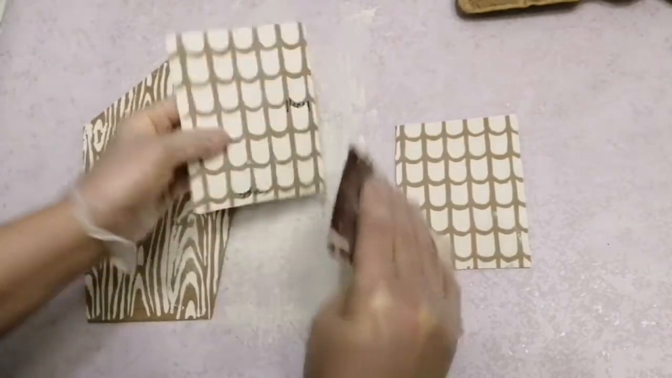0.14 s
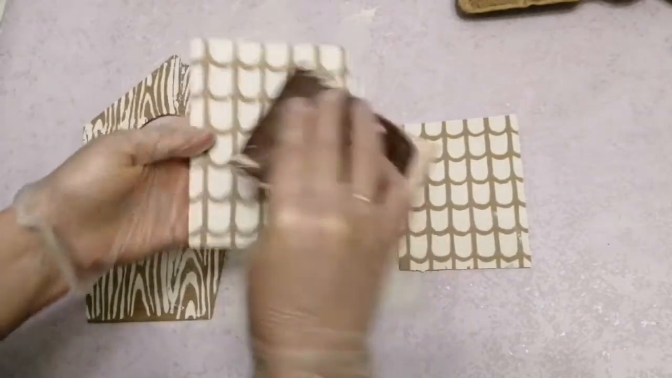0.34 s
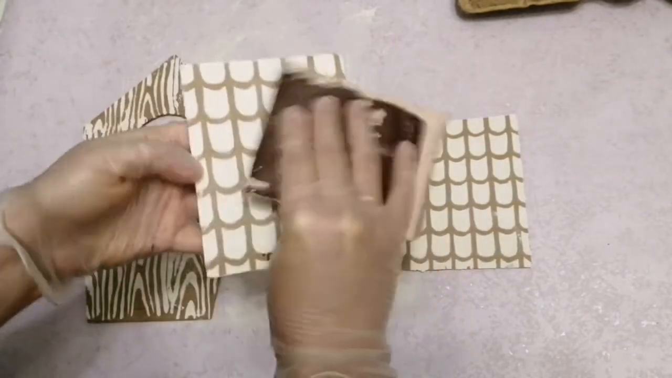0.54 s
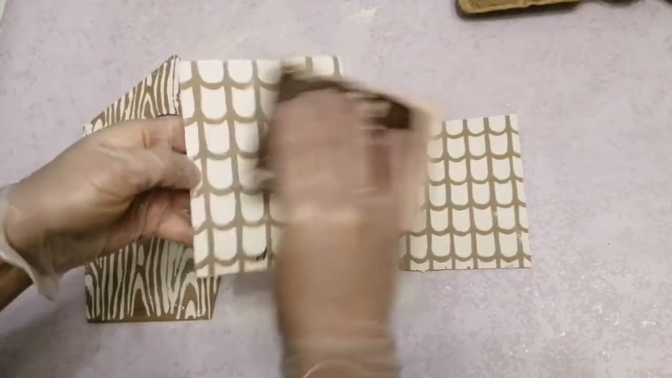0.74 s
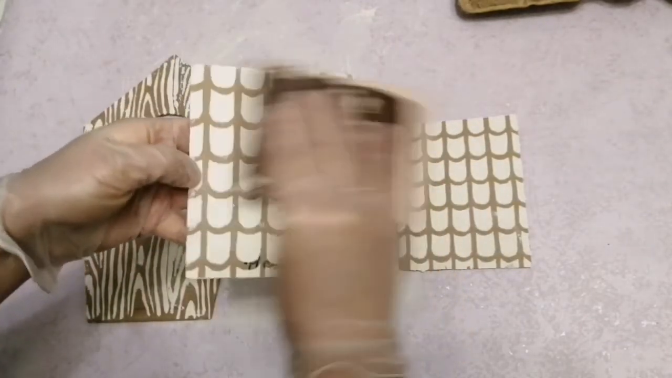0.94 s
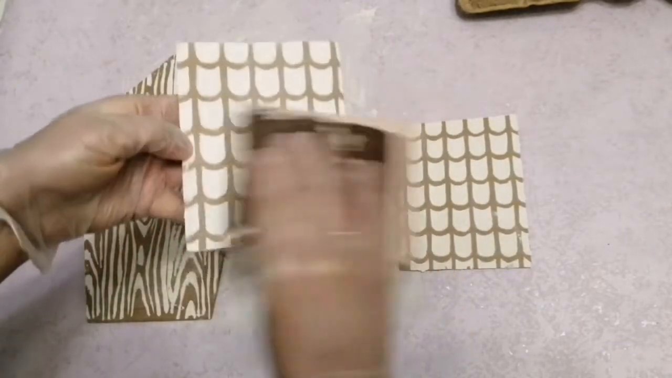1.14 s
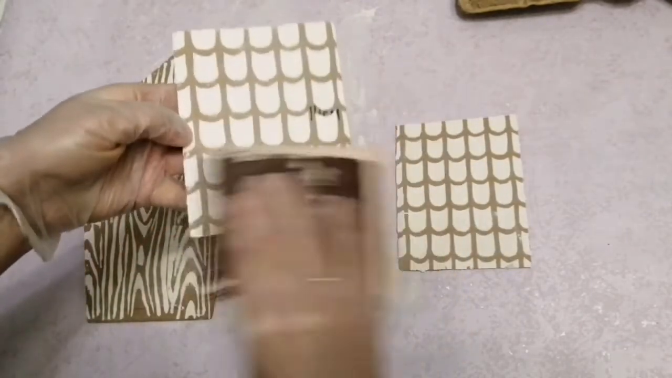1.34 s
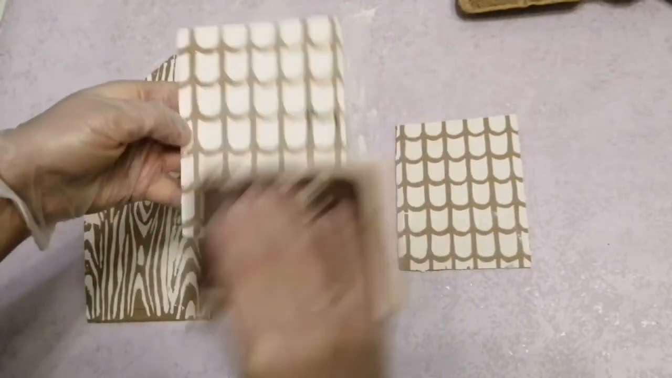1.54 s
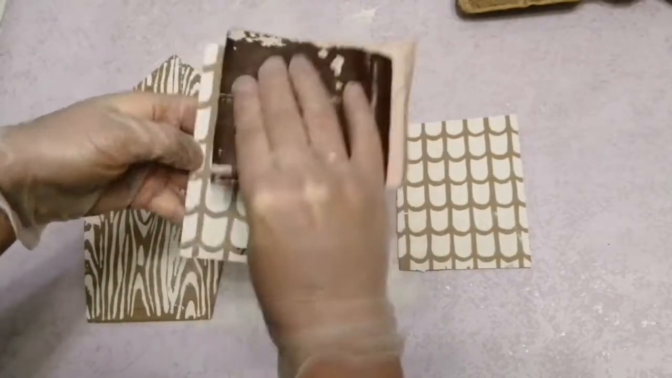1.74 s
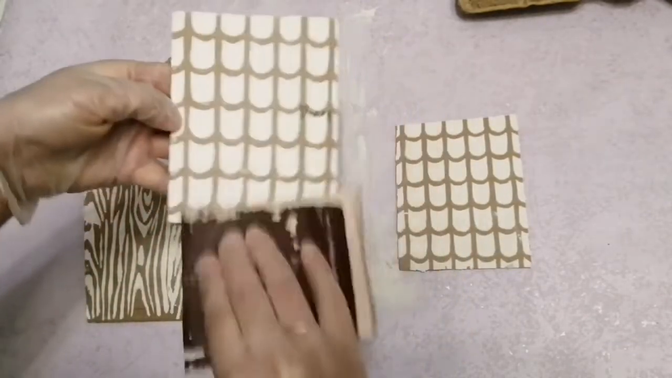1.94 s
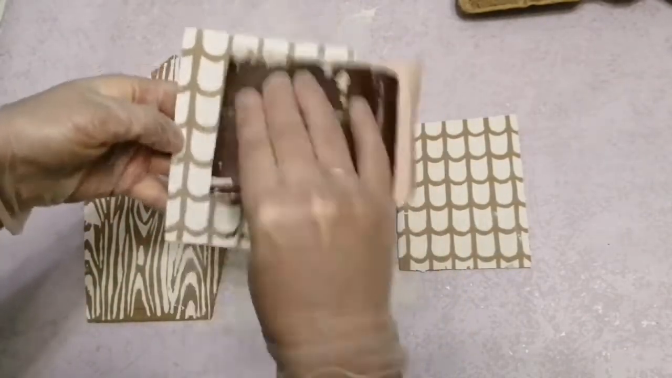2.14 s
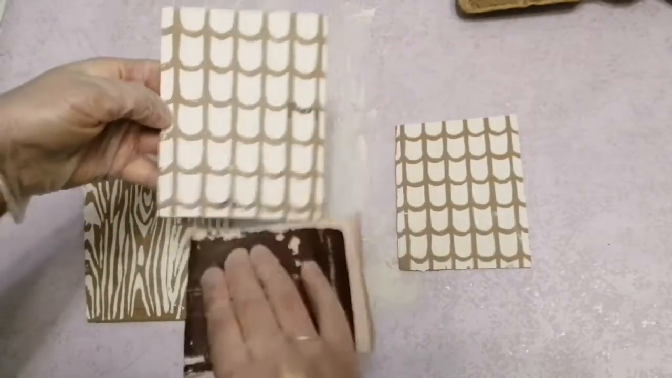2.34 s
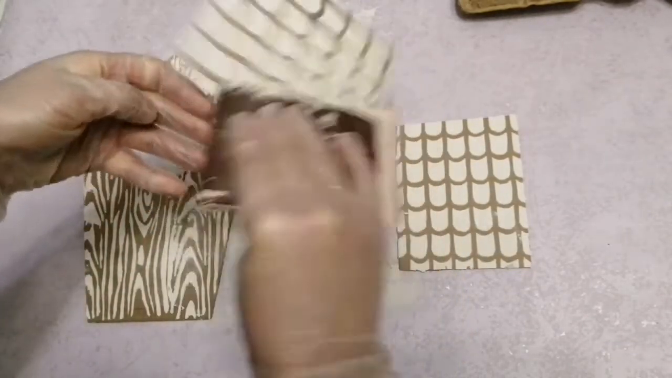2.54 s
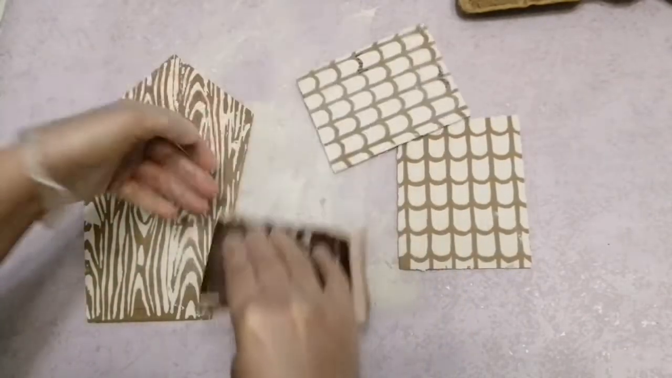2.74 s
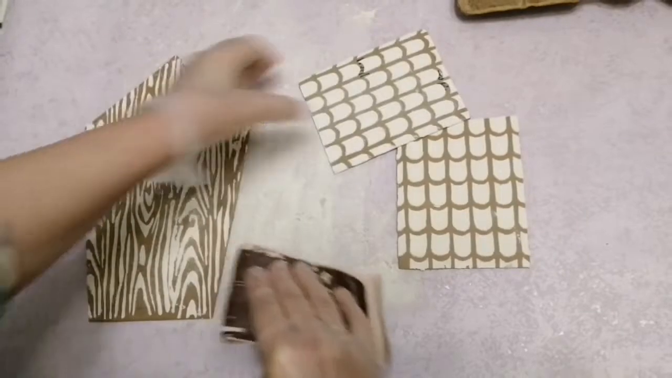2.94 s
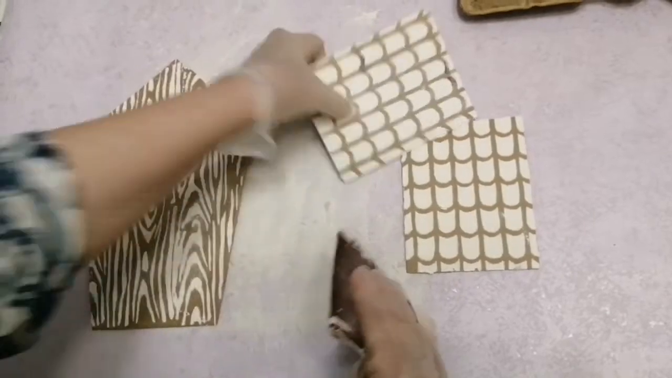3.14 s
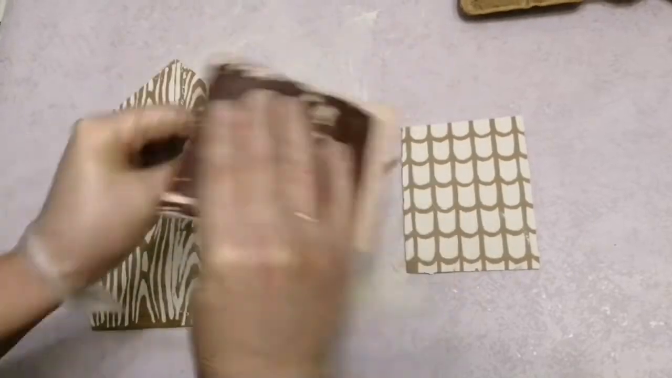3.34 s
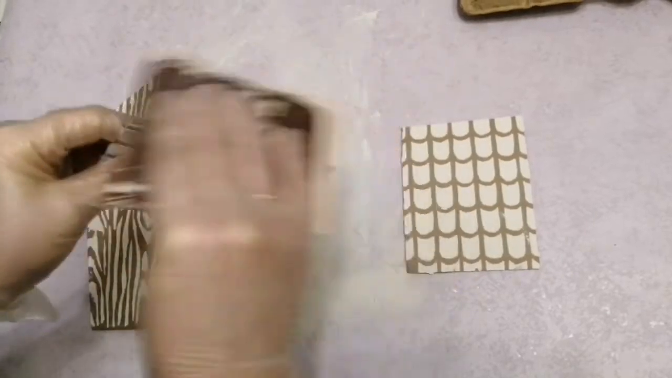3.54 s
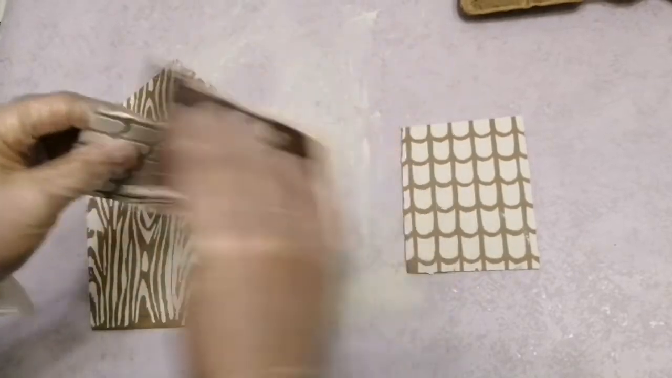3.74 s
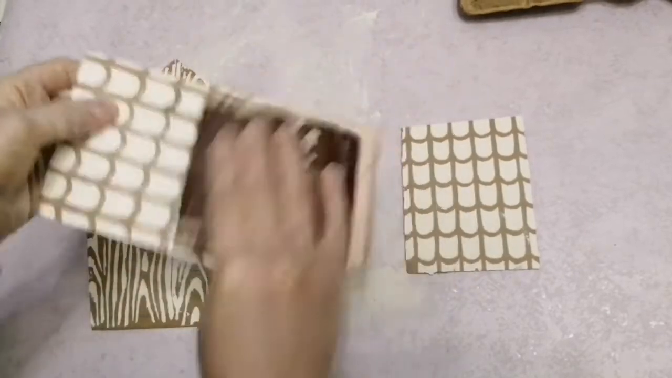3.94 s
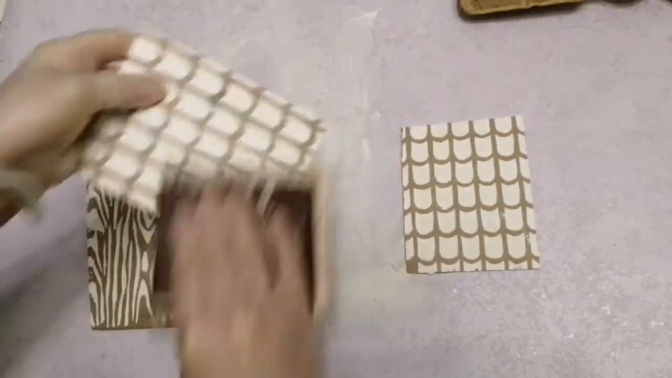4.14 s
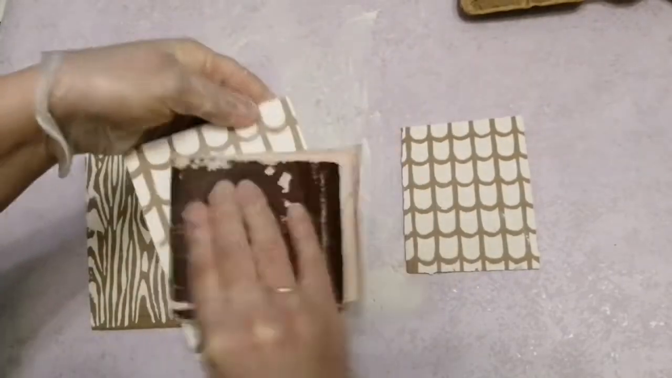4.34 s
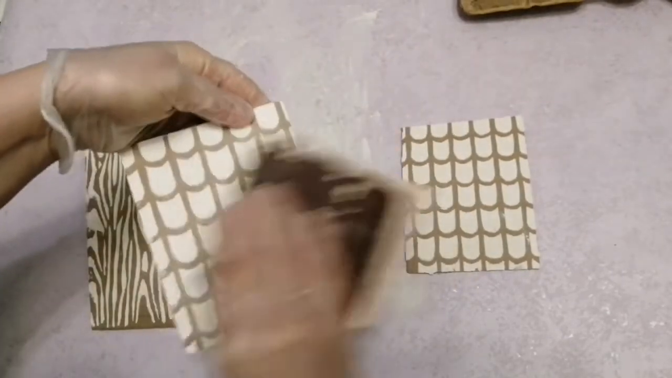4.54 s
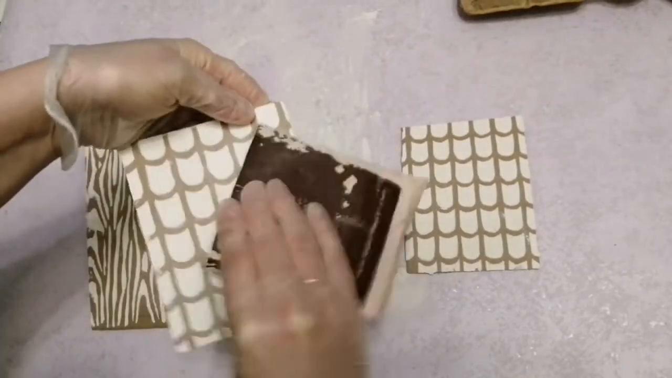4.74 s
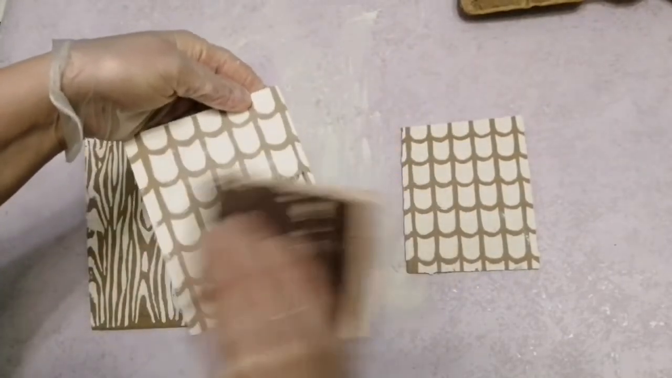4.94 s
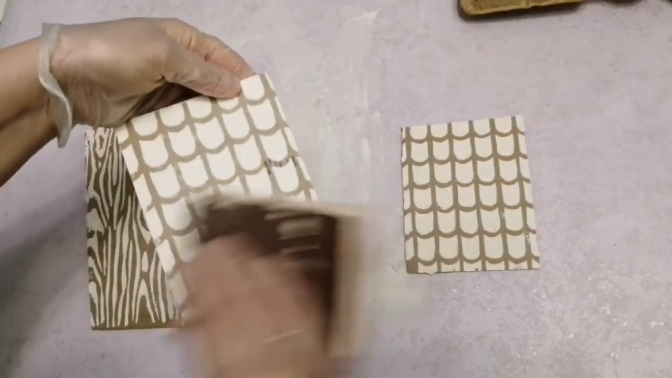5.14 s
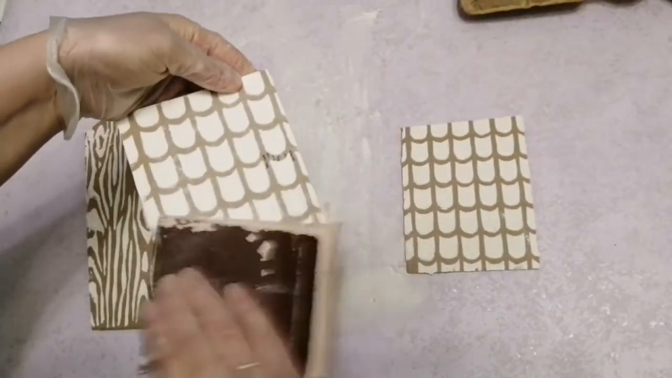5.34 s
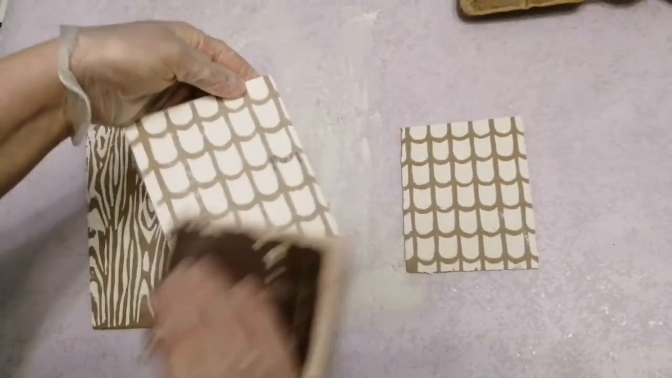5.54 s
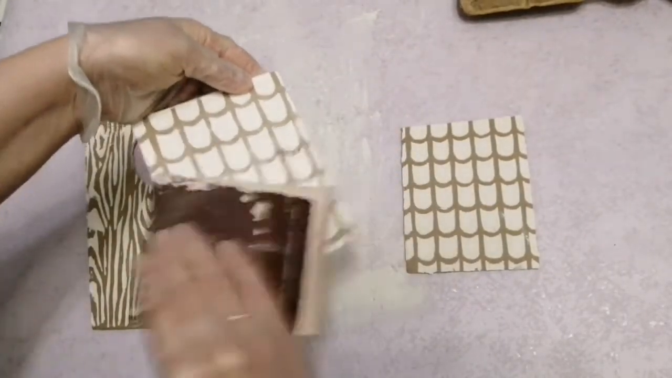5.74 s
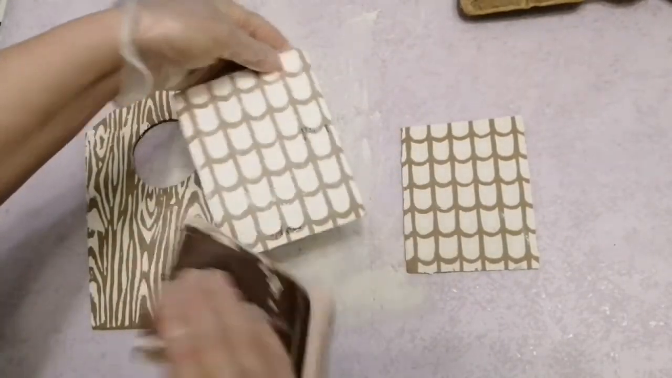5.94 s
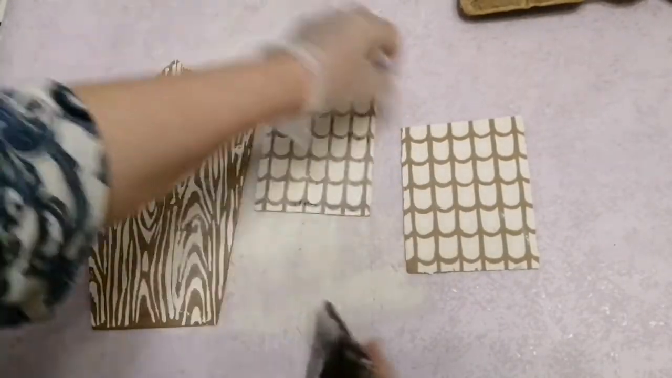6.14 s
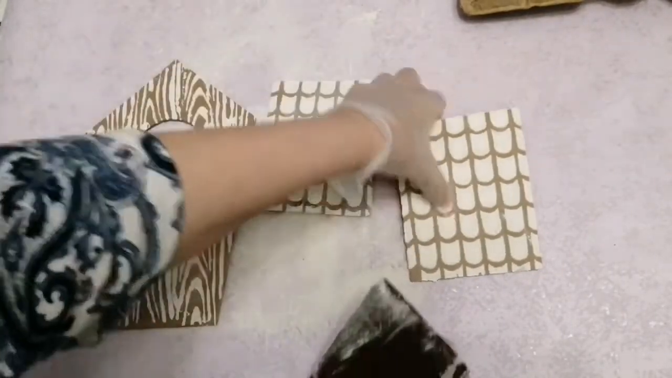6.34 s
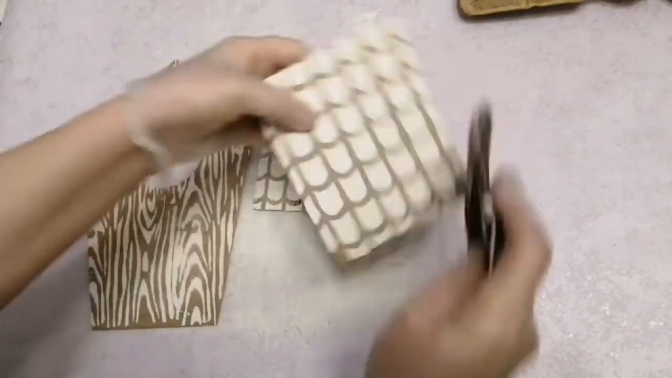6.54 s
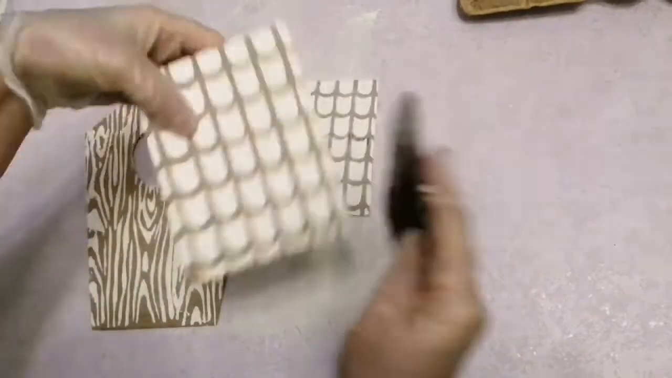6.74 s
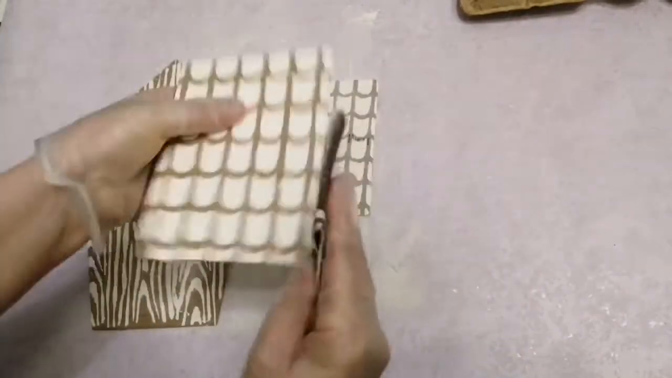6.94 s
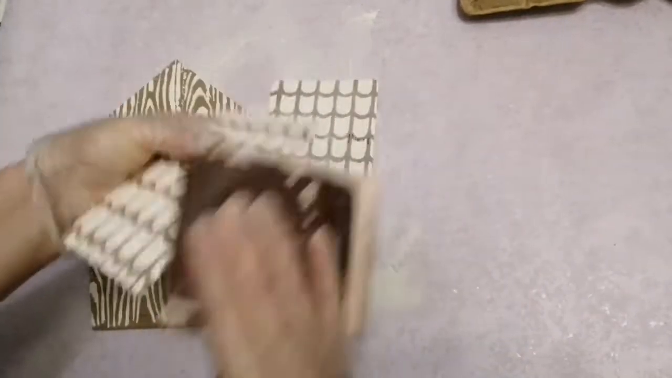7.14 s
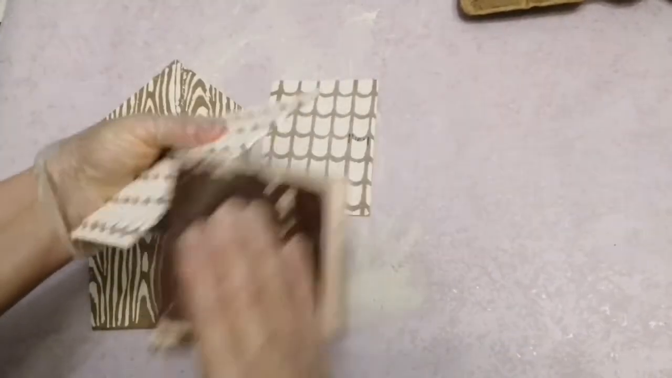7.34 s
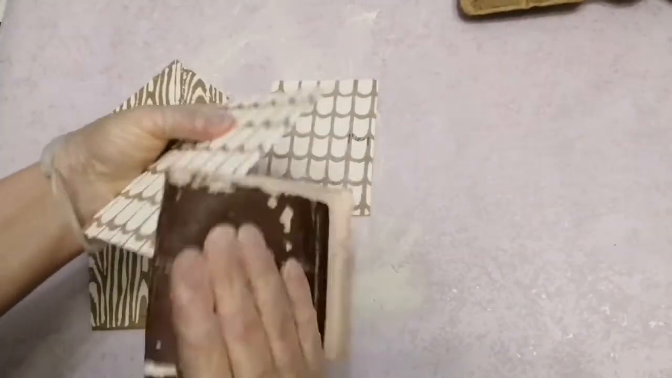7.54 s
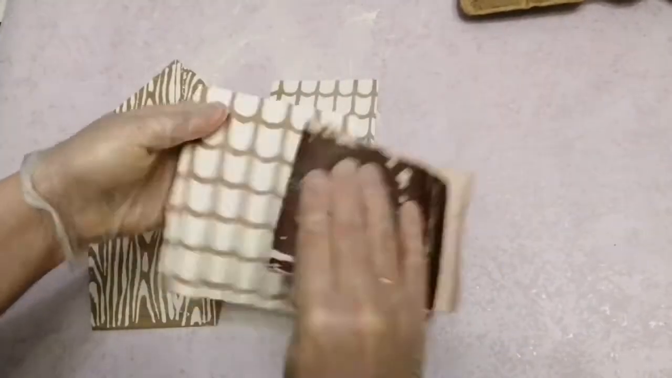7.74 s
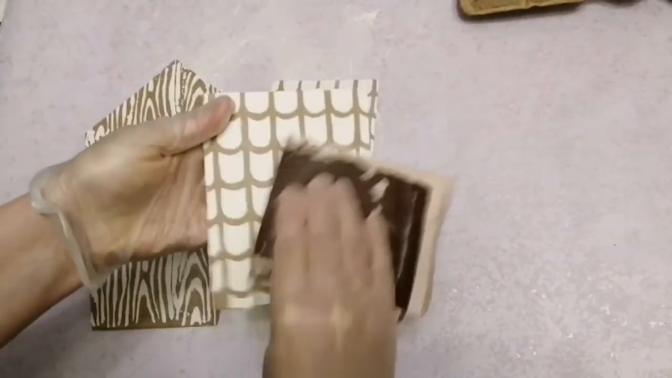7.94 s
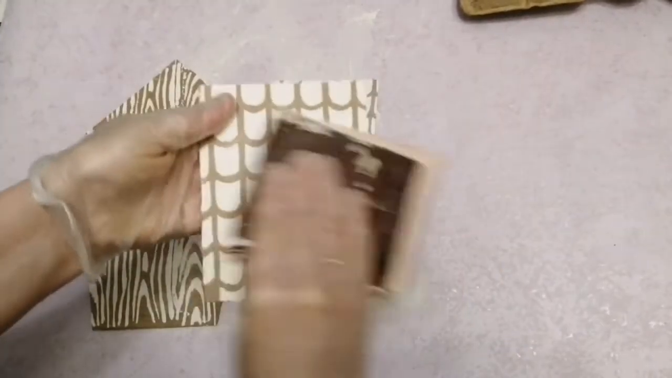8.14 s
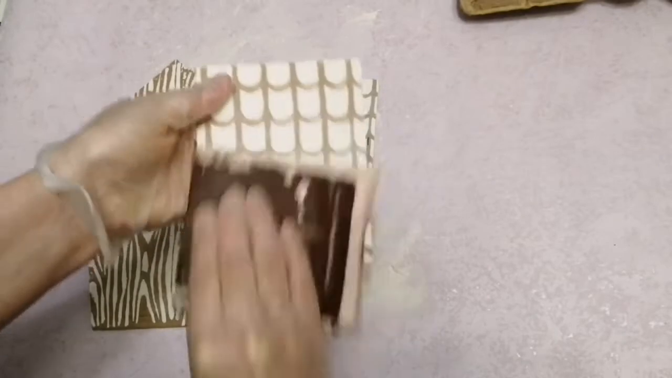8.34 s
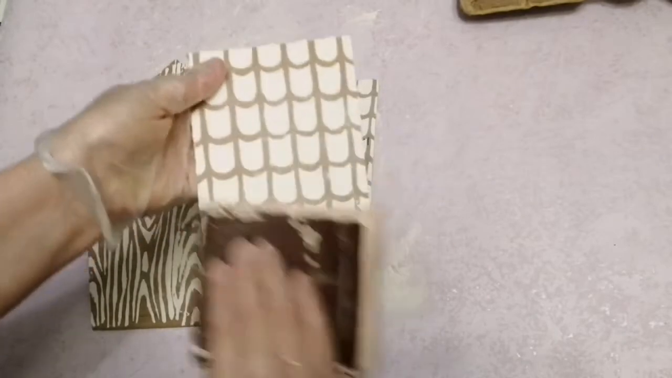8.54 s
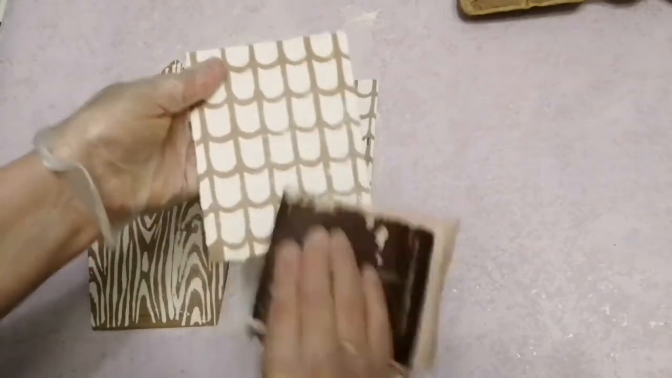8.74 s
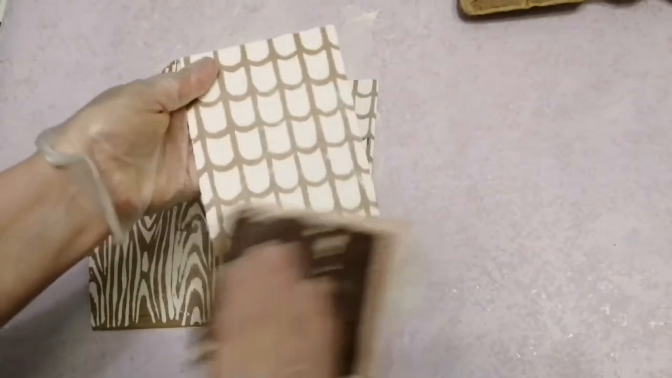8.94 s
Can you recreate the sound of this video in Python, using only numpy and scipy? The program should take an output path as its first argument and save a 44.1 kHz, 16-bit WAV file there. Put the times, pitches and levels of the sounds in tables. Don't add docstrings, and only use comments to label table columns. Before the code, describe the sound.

Sandpaper scrubs back and forth by hand over dried putty on small card sheets, with short pauses, light knocks and clicks, close up in a quiet room.

```python
import sys
import numpy as np
from scipy import signal
from scipy.fft import rfft, irfft
from scipy.io import wavfile
from scipy.ndimage import uniform_filter1d

SR = 44100
rng = np.random.default_rng(int(sys.argv[2]) if len(sys.argv) > 2 else 0)


def digitize_waveform(pressure):
    field = np.atleast_2d(pressure).T
    bounded = np.clip(field, -1, 1)
    quanta = np.round(bounded * 32767).astype(np.int16)
    wavfile.write(sys.argv[1], SR, quanta)


def linear_from_db(decibels):
    return 10 ** (np.asarray(decibels, float) / 20)


N = 396018
TIME = np.arange(N) / SR
RIGHT_LAG = 6


def level(x, db=0):
    return x * linear_from_db(db) / np.sqrt(np.mean(x ** 2))


def even(pair):
    return np.array([level(x) for x in pair])


def band(x, lo_hz, hi_hz, order=2):
    return signal.sosfilt(signal.butter(order, [lo_hz, hi_hz], "band", fs=SR, output="sos"), x)


def colour(x, hz, db):
    log_hz = np.log(np.maximum(np.arange(1025) * SR / 2048, 1))
    cepstrum = irfft(np.interp(log_hz, np.log(hz), db) * np.log(10) / 20)
    cepstrum[1:1024] *= 2
    cepstrum[1025:] = 0
    response = irfft(np.exp(rfft(cepstrum)))
    return signal.fftconvolve(x, response)[:len(x)]


def walk(rate):
    hold = int(SR / rate)
    steps = rng.standard_normal(N // 100)[:N // hold + 1]
    return uniform_filter1d(np.repeat(steps, hold), hold // 2 + 1)[:N]


def panned(db):
    ratio = linear_from_db(db) ** 2
    return np.sqrt(2 * np.array([ratio, ratio ** 0]) / (1 + ratio))


# pitch_hz, left_db, right_db
PORT_RESPONSE = [(150, -21.5, -30.5), (335, -8, -14.5), (650, -4.5, -9.5), (910, -10, -2.5),
                 (1360, -2.5, -0.5), (3240, 5, 5), (4080, -11.5, -3.5), (5310, -8.5, 3), (7100, -10.5, 0.5),
                 (7280, -6.5, -2), (7570, -5.5, -8.5), (12200, -21, -12.5), (15440, -18, -7.5),
                 (16200, -41, -86)]


def ports(pair):
    hz, *db = np.transpose(PORT_RESPONSE)
    left, right = (colour(x, hz, d) for x, d in zip(pair, db))
    return np.array([left, np.roll(right, RIGHT_LAG)])


# start_s, lower_rasp_db re upper rasp, whole_rasp_db re usual
SHEET_BEND = [(0.0, -9, -9), (0.25, -6, 1), (0.6, 0.5, 1.8), (1.5, 0, -0.9), (2.3, 1, 1.7),
              (2.7, -4.5, 3.2), (3.27, 1, -5), (3.45, -8.5, 4), (3.62, -7.5, 2.7), (3.798, -13, 2),
              (4.0, -3.5, 2.5), (4.2, -3.5, 2.1), (4.95, 0, 0), (5.8, 1, -1.7), (6.25, -9, 0.1),
              (6.6, -1, -4.5), (7.65, 5, -0.2), (7.9, -1, 2.4)]


def sanding(rasp_db, hum_db, pan_db, free_db):
    snags = signal.lfilter([1], [1, -.985], (rng.random(N) < 90 / SR) * rng.random(N))
    ridges = linear_from_db(0.89 * walk(45)) * (1 + 0.21 * snags)
    fine = contact(.2, 1.0, .8, 150)
    coarse = contact(.42, 2.5, 1.8, 60)
    fine = bounce(fine, .0007, .4, .3)
    coarse = bounce(coarse, .0016, .5, .5)
    hiss = even(band(fine, 4400, 19000, order=5)) * panned(pan_db)

    rasp = even(band(coarse, 620, 3700, order=6))
    rasp = rasp + linear_from_db(0.97 * free_db) * sheet_modes(coarse)
    lower = signal.sosfiltfilt(signal.butter(2, [650, 2000], "band", fs=SR, output="sos"), rasp)
    s, *columns = np.transpose(SHEET_BEND)
    lower_db, whole_db = (np.interp(TIME, s, c) for c in columns)
    rasp = rasp + (linear_from_db(0.81 * lower_db) - 1) * lower
    rasp = linear_from_db(whole_db) * rasp * panned(pan_db + 0.18)

    hum = even(band(contact(0.95, 1.86, 3.5, 40), 246, 990, order=3)) * panned(1.36 * pan_db + 2.0)
    speed_db = stroke_db()
    pressed_db = hum_db - 0.33 * (speed_db - uniform_filter1d(speed_db, 6000))
    rasp_gain = linear_from_db(rasp_db + 0.5 * (pressed_db - hum_db))
    return linear_from_db(speed_db) * ridges * (hiss + rasp_gain * rasp + linear_from_db(pressed_db) * hum)


def stroke_db():
    turn, low, share, top, start, rest, fall = strokes()
    k = np.clip(np.searchsorted(turn, TIME) - 1, 0, len(turn) - 2)
    rest = rest[k]
    place = (TIME - turn[k] - rest) / (np.diff(turn)[k] - rest)
    share = np.clip(share[k], .02, .97)
    rising = place < share
    speed = np.clip(np.where(rising, place / share, (1 - place) / (1 - share)), 0, 1)
    foot = np.where(rising, low[k], low[k + 1])
    steepness = np.where(rising, start[k], fall[k])
    return foot + (top[k] - foot) * np.sin(np.pi / 2 * speed) ** steepness


# turn_s, full_speed_hiss_db, dip_at_turn_db, rise_share (0-1, part of the stroke until full speed)
FACE_STROKES = [
    (0.474, -31, 19.5, 0.49),
    (0.607, -32, 13, 0.43),
    (0.714, -32, 13.5, 0.47),
    (0.813, -30, 10, 0.59),
    (0.922, -28, 15.5, 0.39),
    (1.026, -28.5, 9.5, 0.43),
    (1.149, -27.5, 5.5, 0.41),
    (1.23, -25, 11, 0.5),
    (1.347, -25, 12, 0.32),
]
QUICK_STROKES = [(4.393, -30.5, 9.4, 0.52), (4.446, -38.5, 4.9, 0.26), (4.493, -33, 12.6, 0.61),
                 (4.553, -28.3, 14.4, 0.43), (4.611, -30.5, 8.2, 0.6), (4.672, -32.5, 7.4, 0.65),
                 (4.701, -30, 4.7, 0.32), (4.737, -30, 10.1, 0.43), (4.787, -31, 12.3, 0.55),
                 (4.836, -31.0, 9, 0.5), (4.888, -30, 7.2, 0.62), (4.913, -31, 3.1, 0.29),
                 (4.945, -29.5, 12, 0.57), (5.006, -30, 6.6, 0.67), (5.032, -32.5, 2.9, 0.29),
                 (5.063, -28.5, 14, 0.43), (5.115, -28.5, 8.5, 0.42), (5.168, -28.5, 5.7, 0.54),
                 (5.192, -30, 2.1, 0.27), (5.219, -31, 8.6, 0.58), (5.269, -27, 14, 0.61),
                 (5.312, -29.5, 11.6, 0.48), (5.372, -31.5, 7.5, 0.38), (5.422, -31.5, 4.1, 0.4),
                 (5.467, -31.5, 5.5, 0.33), (5.51, -32, 7.9, 0.38), (5.567, -34, 6, 0.61),
                 (5.611, -30.5, 6.4, 0.66), (5.669, -32, 13, 0.29), (5.718, -29, 15.4, 0.73),
                 (5.769, -29.5, 6, 0.26)]
EDGE_STROKES = [
    (7.095, -37, 17, 0.74),
    (7.229, -35, 22, 0.41),
    (7.345, -33.5, 18, 0.54),
    (7.475, -35.5, 16.7, 0.65),
    (7.576, -33, 18.7, 0.5),
]
BROAD_STROKES = [(7.906, -31.5, 6.4, 0.64), (7.979, -30, 14, 0.32), (8.16, -30, 10.2, 0.65),
                 (8.231, -31, 2.4, 0.29), (8.31, -30, 7.7, 0.57), (8.481, -31, 11.5, 0.43),
                 (8.633, -32.5, 10.3, 0.87), (8.721, -35.5, 2.7, 0.21), (8.784, -36, 9.6, 0.34),
                 (8.866, -33.5, 4.8, 0.46), (8.927, -34, 15, 0.94)]
# start_s, hiss_before_db, rise_share (0-1), full_speed_hiss_db
AIR_SWEEPS = [(0.385, -58.5, 0.54, -36), (1.436, -38.5, 0, -27), (1.795, -54, 0.27, -26.5),
              (2.197, -74, 0.3, -26), (3.376, -77, 0.43, -35), (3.569, -86, 0.38, -34),
              (3.73, -75, 0.46, -31), (3.942, -86, 0.3, -28.5), (4.122, -80.5, 0.25, -28),
              (4.306, -79.5, 0.63, -29.5), (5.812, -46, 0.19, -33.5), (7.012, -68, 0.35, -35.5),
              (7.812, -70, 0.5, -31)]
# start_s, hiss_before_db, rise_share (0-1), full_speed_hiss_db
GLOVE_BRUSHES = [(0.0, -53, 0.14, -73), (0.064, -70, 0.35, -66.5), (0.13, -68, 0.35, -52.5),
                 (0.318, -54.5, .17, -53.5), (1.748, -89, 0.26, -55), (2.176, -76.5, 0.2, -50.5),
                 (2.461, -49.5, 0.27, -46.5), (2.579, -62, 0.22, -55.5), (2.653, -62, 0.29, -55),
                 (2.688, -62, 0.076, -38), (2.728, -50, 0.02, -44.5), (2.982, -76.5, 0.7, -48),
                 (3.167, -53.5, 0.25, -48), (3.215, -54, 0.71, -58.5), (3.325, -70, 0.05, -63),
                 (3.869, -53, 0.48, -56), (5.932, -58, .1, -70), (6.07, -76, 0.65, -57),
                 (6.189, -72, .29, -73), (6.241, -77, 0.64, -58), (6.282, -60, 0.56, -56),
                 (6.347, -66, 0.19, -47), (6.438, -55, 0.21, -43.5), (6.54, -56.5, 0.69, -51.5),
                 (6.634, -58, .043, -65), (6.703, -68, 0.17, -63), (6.8, -74, 0.16, -42),
                 (6.917, -61.5, 0.73, -50.5), (7.725, -57, 0.34, -54)]


def strokes():
    # slowness of the start, rest at the turn s, earliness of the slowing
    bouts = ((FACE_STROKES, (0.83, 0.0059, 1.75)), (QUICK_STROKES, (0.61, 0.0028, 1.56)),
             (EDGE_STROKES, (0.43, 0.0037, 1.45)), (BROAD_STROKES, (0.41, 0.0024, 0.7)))
    rows = [(s, top - dip, share, top, *gait) for bout, gait in bouts for s, top, dip, share in bout]
    for moves, (least, more, fall) in (AIR_SWEEPS, (0.18, 1.76, 1.46)), (GLOVE_BRUSHES, (0.59, 5.3, 2.5)):
        rows += [(*row, least + more * row[2] ** 2, 0, fall) for row in moves]
    rows.sort()
    end = (N / SR, rows[-1][3], *rows[-1][2:])
    return np.transpose(rows + [end])


def grit(density, scatter_db):
    size = linear_from_db(scatter_db * np.minimum(rng.exponential(size=N), 5))
    ticks = (rng.random(N) < density) * size
    return level(ticks * rng.standard_normal(N))


def contact(shared, scatter_db, patchy_db, patch_rate):
    both, *own = (grit(.3, scatter_db) for _ in range(3))
    heard = ports(np.sqrt(shared) * both + np.sqrt(1 - shared) * np.array(own))
    return heard * linear_from_db(patchy_db * walk(patch_rate))


def bounce(pair, lag_s, sway, share):
    drift = uniform_filter1d(walk(14), 1500)
    late = TIME - lag_s * (1 + sway * np.tanh(drift))
    return np.array([x + share * np.interp(late, TIME, x) for x in pair])


# pitch_hz, width_hz, level_db re rasp when loosely held
BENDING_MODES = [
    (277, 45, -22),
    (400, 40, -19),
    (484, 102, -18.5),
    (1256, 190, -17.5),
    (1560, 62, -20),
    (2410, 340, -13),
    (2800, 230, -20.5),
]


def sheet_modes(x):
    total = 0
    for hz, width, db in BENDING_MODES:
        mode = even(signal.lfilter(*signal.iirpeak(hz, hz / width, fs=SR), x))
        total = total + linear_from_db(db + 3.06 * walk(18)) * mode
    return total


def knocks(pan_db):
    out, t = np.zeros((2, N + 9000)), TIME[:8000]
    events = blows()
    dust = rng.standard_normal((len(events), 2, len(t)))
    for (s, thud_db, hz, ring_s, snap_db, tick_db), noise in zip(events, dust):
        fade = np.exp(-np.log(1000) * t / ring_s)
        sheet = np.sin(2 * np.pi * hz * t) + 0.058 * np.sin(2 * np.pi * 1.52 * hz * t) * fade
        push = 0.4 * np.sin(2 * np.pi * 260 * t) * np.exp(-(t / 0.0012) ** 2)
        rattle = 0.2 * level(band(noise[0], 0.67 * hz, 1.29 * hz)) * np.sqrt(fade)
        thud = -band(0.49 * sheet * fade + push + rattle, 160, 1550)
        heard = ports(noise + noise[0])
        upper_mode = band(heard, 3.3 * hz, 3.9 * hz, order=1)
        card = band(heard, 720, 4100) + 0.59 * upper_mode
        snap = even(card) * (np.exp(-t / .0028) + .14 * np.exp(-t / .02))
        tick = even(band(heard, 3160, 11600)) * (np.exp(-t / 0.0029) + 0.089 * np.exp(-t / 0.015))
        at = int((s + .001) * SR)
        crack = linear_from_db(snap_db + 5.0) * snap + linear_from_db(tick_db + 2.0) * tick
        out[:, at:at + len(t)] += linear_from_db(thud_db) * panned(pan_db[at] + 6.0)[:, None] * thud
        out[:, at:at + len(t)] += panned(pan_db[at])[:, None] * crack
    return out[:, :N]


# start_s, thud_db, pitch_hz, grit_tick_db
PAPER_LANDINGS = [(0.302, -46, 440, -56), (0.393, -43, 486, -44), (0.427, -38, 544, -29),
                  (1.446, -42, 770, -47), (1.806, -37, 614, -34), (2.323, -27, 730, -42),
                  (2.481, -37.5, 650, -48), (2.664, -65, 377, -57), (2.701, -34.5, 450, -45),
                  (3.217, -47, 215, -57), (3.593, -28, 390, -34), (3.743, -34.5, 446, -57),
                  (3.956, -28.5, 458, -46), (4.335, -39, 454, -41), (5.948, -67, 223, -49),
                  (6.136, -50, 194, -41), (6.638, -63, 466, -62), (6.867, -40, 373, -42),
                  (7.036, -36, 590, -34), (7.146, -29, 614, -51), (7.791, -41, 368, -62)]
# start_s, thud_db, pitch_hz, card_snap_db
CARD_DROPS = [(0.451, -46, 470, -43), (2.357, -26, 502, -35), (2.69, -34, 440, -36),
              (2.729, -30.5, 292, -25.5), (2.746, -30, 423, -37), (3.066, -41.5, 271, -46),
              (3.378, -37, 396, -52), (3.571, -31.5, 385, -49), (3.946, -29, 668, -46),
              (4.132, -40, 503, -55), (5.899, -46.5, 426, -54), (6.114, -47, 394, -45),
              (6.157, -62, 240, -49), (6.266, -41.5, 373, -52), (6.364, -46, 720, -36),
              (6.444, -43, 454, -45), (6.481, -32.5, 456, -40.5), (6.554, -40.5, 550, -70),
              (6.821, -33, 412, -34), (6.964, -38.5, 400, -45.5), (7.101, -38.5, 550, -36.5),
              (7.175, -30, 413, -32)]
# start_s, thud_db, pitch_hz, card_snap_db, ring_s
HELD_KNOCKS = [(0.004, -43, 368, -76, 0.38), (0.007, -40, 261, -65, 0.22), (0.074, -43.5, 280, -68, 0.25),
               (0.1, -54, 383, -72, 0.17), (1.752, -25, 400, -37.5, 0.044), (1.755, -33, 323, -65, 0.11),
               (2.177, -19.5, 370, -67, 0.026), (2.49, -28, 222, -40, 0.043), (2.509, -34, 220, -41, 0.045),
               (2.598, -40.5, 474, -59, 0.26), (2.603, -40.5, 215, -60, 0.23),
               (3.175, -46, 400, -38.5, 0.11), (3.191, -39, 468, -41.5, 0.11),
               (3.721, -45, 406, -61, 0.084), (4.121, -38, 393, -61, 0.14), (6.092, -51.5, 484, -72, 0.26)]


def blows():
    def ring_s(hz):
        return 0.085 * (400 / hz) ** 0.24

    landings = [(s, db, hz, ring_s(hz), tick - 6.5, tick) for s, db, hz, tick in PAPER_LANDINGS]
    drops = [(s, db, hz, ring_s(hz), snap, snap - 4) for s, db, hz, snap in CARD_DROPS]
    held = [(s, db, hz, own_s, snap, snap + 3.5) for s, db, hz, snap, own_s in HELD_KNOCKS]
    return landings + drops + held


# start_s, peak_db, pitch_hz
CATCH_CLICKS = [(0.104, -52, 4900), (2.227, -29, 5500), (2.585, -52, 6500), (2.664, -40, 5700),
                (2.69, -34, 5500), (2.7, -30, 6000), (2.73, -23, 3020), (2.73, -25, 6500),
                (2.814, -39, 2800), (2.832, -40, 2800), (2.845, -41, 2370), (3.572, -42, 2600),
                (3.967, -26, 3300), (3.972, -22, 5200), (3.99, -26, 5500), (4.017, -24, 5600),
                (4.123, -39, 5500), (4.124, -41, 2500), (4.131, -35, 2400), (4.502, -31, 5570),
                (4.569, -22, 5800), (4.901, -30, 5700), (5.289, -27, 6060), (5.347, -24, 6000),
                (5.645, -33, 2800), (5.683, -30, 2700), (5.687, -20, 5900), (5.73, -29, 2700),
                (6.137, -37, 5570), (6.197, -49, 5500), (6.222, -52, 2900), (6.266, -46, 5800),
                (6.342, -46, 6000), (6.345, -45, 2000), (6.372, -36.5, 1500), (6.372, -45, 2600),
                (6.449, -40, 5000), (6.487, -33, 6000), (6.635, -44.5, 3000), (6.6355, -35, 6900),
                (7.105, -36, 3000), (7.239, -33, 5900), (7.357, -36, 6000), (7.428, -30, 2500),
                (7.826, -42, 1800), (7.841, -23.5, 1880), (7.866, -29, 2800), (8.335, -24, 5400)]


def clicks(pan_db):
    out, t = np.zeros((2, N)), TIME[:2000]
    fade_cycles, width = 7.6, 1.21
    for (s, db, hz), noise in zip(CATCH_CLICKS, rng.standard_normal((len(CATCH_CLICKS), 2, len(t)))):
        at = int(s * SR)
        burst = even(band(noise + noise[0], hz / width, hz * width)) * np.exp(-t * hz / fade_cycles)
        out[:, at:at + len(t)] += linear_from_db(db - 3) * panned(pan_db[at])[:, None] * burst
    return out


# start_s, peak_db, pitch_hz, ring_s
TAP_MODES = [(2.601, -39, 1900, 0.031), (2.601, -47, 1170, 0.061), (2.601, -53, 920, .09),
             (2.691, -36, 1850, 0.055), (2.693, -36, 1094, .06), (2.179, -41, 163, 0.07),
             (3.966, -18, 3230, 0.052), (4.015, -30, 3270, 0.045), (2.745, -44, 1090, 0.12),
             (3.481, -29, 2400, .05), (3.795, -26, 2800, 0.1), (2.7, -40, 1480, .04),
             (2.73, -32, 3470, .02), (2.731, -17, 4300, 0.011), (2.73, -28, 1736, 0.033),
             (2.744, -33, 1754, 0.06), (2.504, -27, 2830, 0.023), (3.172, -44, 1584, 0.11),
             (3.178, -46, 2070, 0.11), (3.377, -45, 1980, .04), (3.385, -42, 2200, 0.044),
             (6.114, -45, 2320, .04), (6.197, -39, 3070, .03), (6.203, -46, 2800, .03),
             (6.266, -33.5, 2900, 0.015), (6.585, -53, 2020, .1), (6.655, -57, 740, 0.067),
             (7.406, -35, 1040, 0.092), (7.661, -36, 1450, 0.06), (7.665, -34, 461, 0.06),
             (3.429, -35, 500, 0.05), (6.137, -39, 1830, 0.03), (6.44, -39, 970, 0.055),
             (6.482, -37, 2300, .04), (6.816, -28.5, 1900, 0.035), (6.962, -40, 1910, 0.064),
             (7.033, -26, 1620, 0.039), (7.521, -32.5, 494, 0.11), (7.28, -33.5, 436, 0.057),
             (7.592, -40.5, 1214, 0.19), (5.94, -52, 1110, 0.056), (5.886, -42, 1020, 0.054)]
# start_s, peak_db, pitch_hz, ring_s
TABLE_BOOMS = [(0.084, -56, 45, .2), (0.731, -43, 388, 0.25), (0.736, -54.5, 273, 0.27),
               (1.96, -54.5, 281, 0.26), (2.505, -43, 90, 0.12), (5.934, -58, 130, .15),
               (6.03, -55, 150, 0.23), (6.134, -46, 262, 0.11), (6.135, -45, 140, .1),
               (6.267, -52, 113, 0.098), (6.375, -54, 185, 0.27), (6.482, -40, 185, 0.051),
               (6.548, -50, 100, 0.16), (6.562, -54, 400, 0.11)]


def pings(pan_db):
    out, t = np.zeros((2, N)), TIME[:6000]
    port_delay = np.array([[0], [RIGHT_LAG / SR]])
    taps = TAP_MODES + TABLE_BOOMS
    for (s, db, hz, ring_s), turn in zip(taps, rng.random(len(taps))):
        shape = (1 - np.exp(-t / 0.00049)) * np.exp(-np.log(1000) * t / ring_s)
        at = int(s * SR)
        ring = np.sin(2 * np.pi * (hz * (t - port_delay) + turn))
        out[:, at:at + len(t)] += linear_from_db(db) * panned(pan_db[at])[:, None] * shape * ring
    return out


def squeak():
    start_s, end_s, pitch_hz, level_db = 1.62, 1.74, 4270, -70
    u = np.clip((TIME - start_s) / (end_s - start_s), 0, 1)
    pitch = pitch_hz + 30 * walk(40) - 130 * u ** 3
    swell = linear_from_db(level_db + 2 * walk(30)) * np.sin(np.pi * u) ** .4
    return swell * np.sin(2 * np.pi * np.cumsum(pitch) / SR)


# start_s, rumble_db, shudder_s
TABLE_JOLTS = [(0.07, -59.5, 1), (0.385, -53, .5), (1.68, -75, 0.61), (1.77, -68, .4), (2.178, -39, 0.15),
               (2.3, -56, 0.98), (2.485, -50.5, 0.47), (2.6, -69, 0.37), (2.7, -54.5, 0.75),
               (3.06, -63, 0.66), (3.2, -63, 0.16), (3.59, -63, .2), (3.745, -60, 0.27), (3.945, -49, 0.19),
               (4.13, -57, 0.3), (4.33, -64, 0.17), (5.36, -70, 0.69), (5.92, -74, 0.76), (6.03, -81, 0.91),
               (6.125, -66, 0.38), (6.38, -59, 0.5), (6.48, -62, 0.47), (6.81, -65, 0.78),
               (7.13, -61, 0.95), (7.64, -56, 0.23), (7.785, -53, 0.23), (8.75, -71, .9)]


def table():
    mid, side = rng.standard_normal((2, N))
    shake = band(mid + 0.5 * side * np.array([[1], [-1]]), 26, 334)
    size = np.full(N, linear_from_db(-72.5))
    for s, db, shudder_s in TABLE_JOLTS:
        after = size[int(s * SR):int(s * SR) + SR]
        since = TIME[:len(after)]
        after += linear_from_db(db) * np.minimum(since / 0.0025, 1) * np.exp(-np.log(1000) * since / shudder_s)
    return level(shake) * size * linear_from_db(2.0 * walk(25))


def room(x, t60, wet_db):
    t = TIME[:12000]
    tail = rng.standard_normal((2, len(t))) * np.exp(-np.log(1000) * t / t60) * (t > .003)
    tail = tail / np.sqrt(np.sum(tail ** 2, axis=1, keepdims=True))
    return linear_from_db(wet_db) * signal.fftconvolve(x, tail, axes=1)[:, :N]


# pitch_hz, level_db per Hz
ROOM_SPECTRUM = [(18, -41), (30, -10), (156, -28), (270, -46), (369, -11), (561, -1.5), (3150, -2.5),
                 (3880, -6), (6720, -1), (10500, -10), (15500, -11)]


def hush():
    hz, db = np.transpose(ROOM_SPECTRUM)
    mid, side = rng.standard_normal((2, N))
    side = signal.sosfilt(signal.butter(1, 60, "high", fs=SR, output="sos"), side)
    return level(np.array([colour(x, hz, db) for x in (mid + side, mid - side)]), -67.5)


# start_s, freedom_to_vibrate_db, left_minus_right_db
SHEET_GRIP = [(0.0, 20, -2.5), (0.2, -5.5, -0.5), (0.75, 0, -0.5), (1.4, -6.5, -2), (2.0, -3.5, -2.5),
              (2.6, -9, -2.5), (2.9, 19.5, 3.5), (3.25, 0, -1.5), (3.5, 6.5, -1.5), (4.3, 0.5, -1),
              (4.65, -8, -6), (5.75, -3.5, -6), (6.1, 8, -11.5), (6.6, 5.5, -8), (7.2, 11, -4),
              (7.75, 0, -2.5), (8.4, -2, -5), (8.98, 5.5, -3)]


def scene():
    s, *columns = np.transpose(SHEET_GRIP)
    free_db, pan_db = (np.interp(TIME, s, c) for c in columns)
    near = sanding(-5.5 + 0.15 * free_db, -15.5 + free_db, pan_db, free_db)
    near = near + knocks(pan_db) + clicks(pan_db) + pings(pan_db) + squeak()
    return near + room(near, .2, -18) + table() + hush()


def top_cut(x):
    return signal.sosfilt(signal.butter(12, 15950, fs=SR, output="sos"), x)


def record(dry):
    return top_cut(dry)


dry = scene()
out = record(dry)
digitize_waveform(out)
```